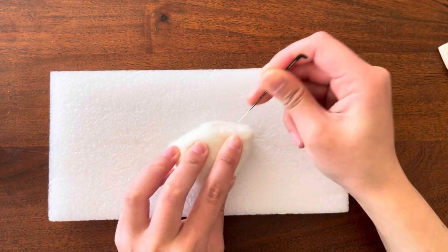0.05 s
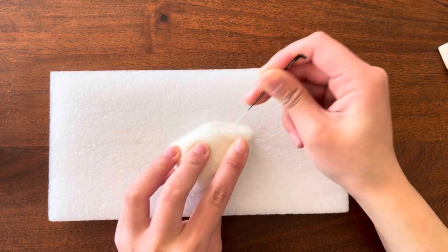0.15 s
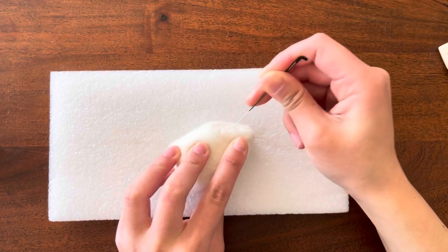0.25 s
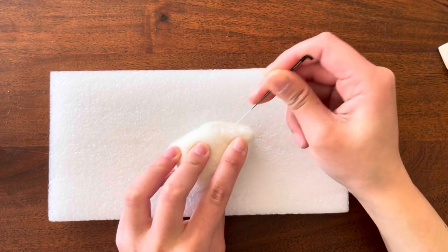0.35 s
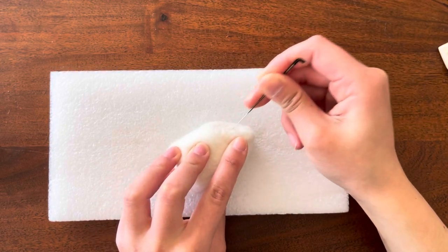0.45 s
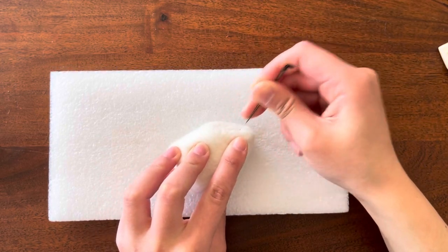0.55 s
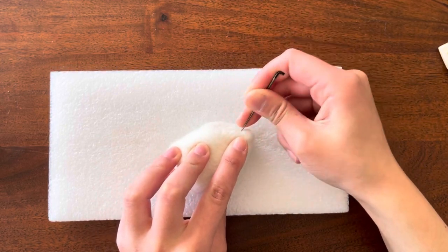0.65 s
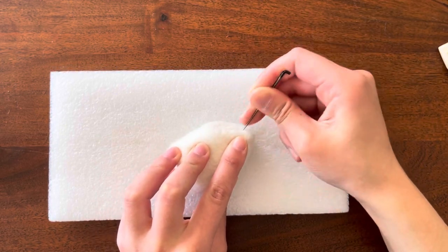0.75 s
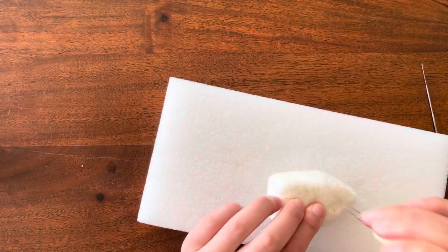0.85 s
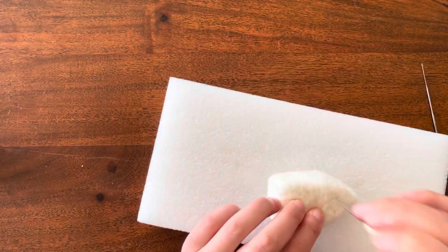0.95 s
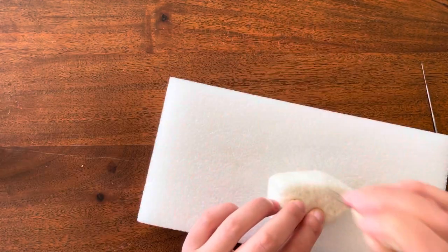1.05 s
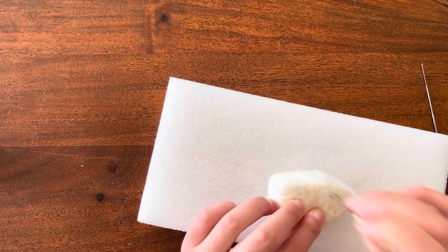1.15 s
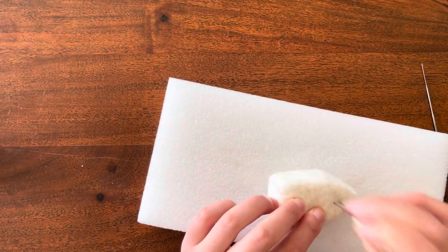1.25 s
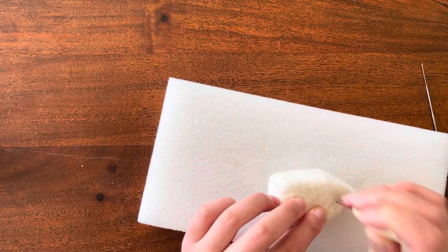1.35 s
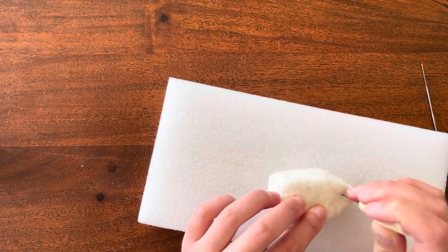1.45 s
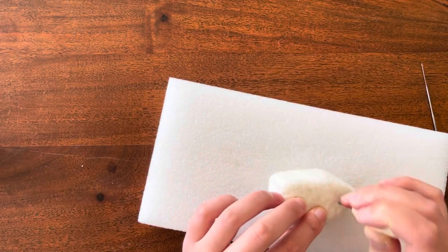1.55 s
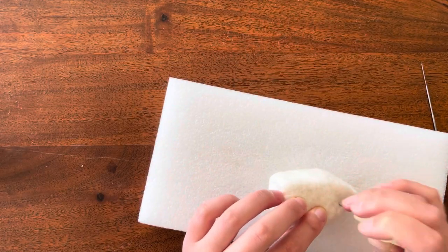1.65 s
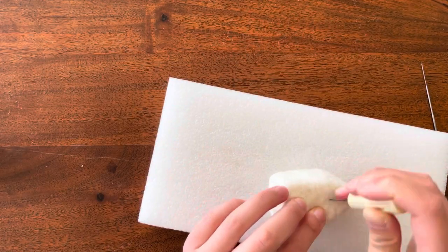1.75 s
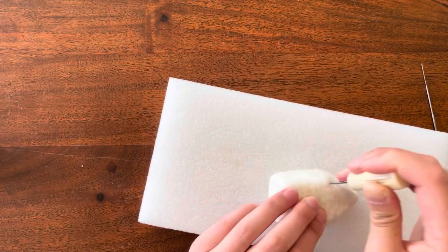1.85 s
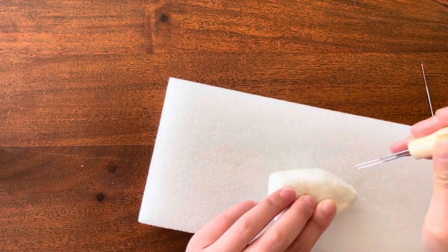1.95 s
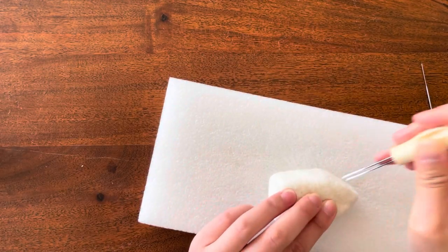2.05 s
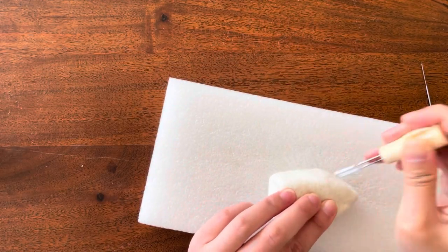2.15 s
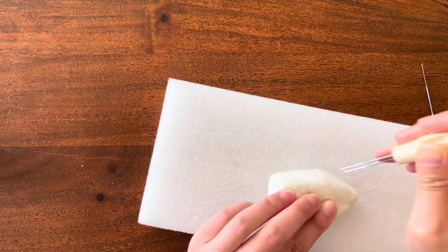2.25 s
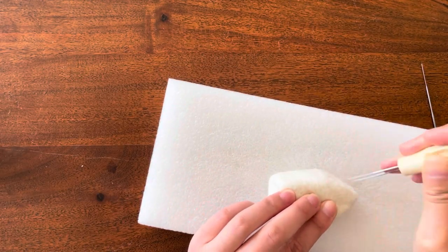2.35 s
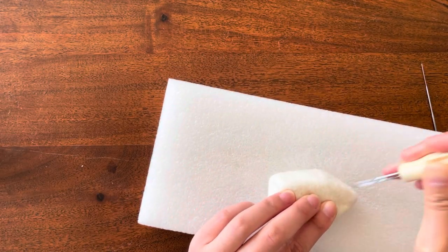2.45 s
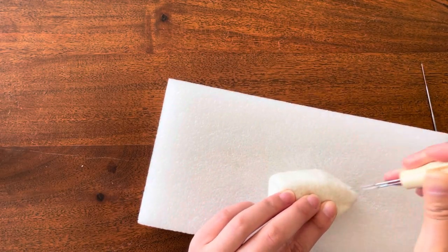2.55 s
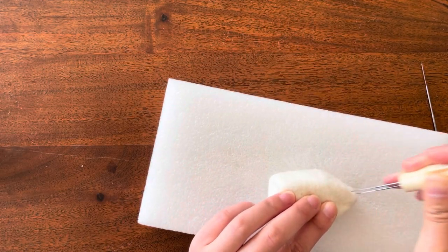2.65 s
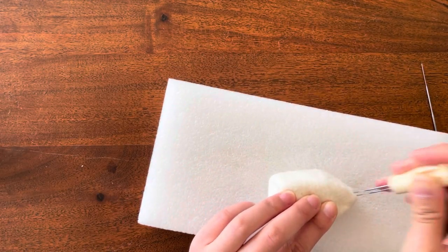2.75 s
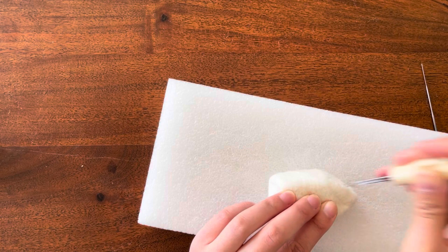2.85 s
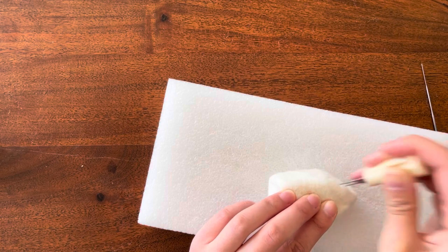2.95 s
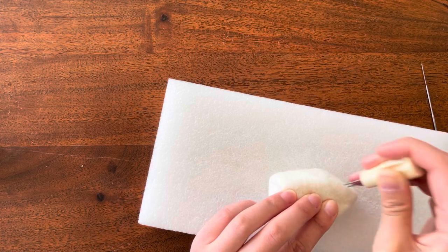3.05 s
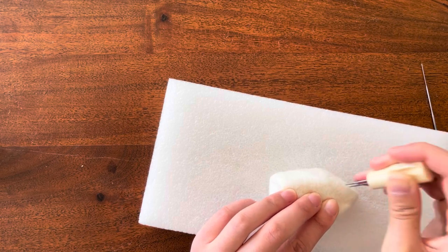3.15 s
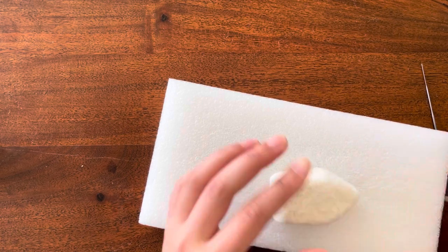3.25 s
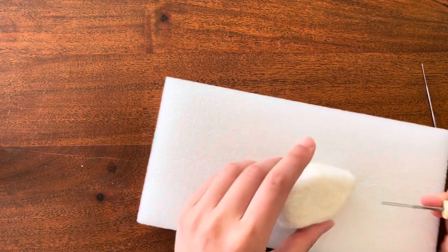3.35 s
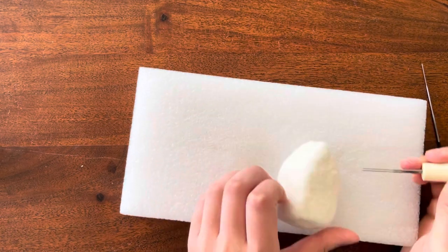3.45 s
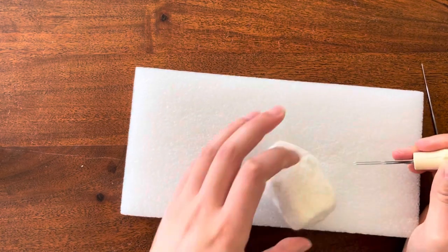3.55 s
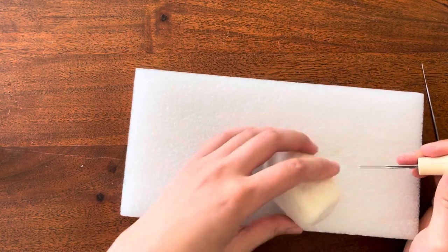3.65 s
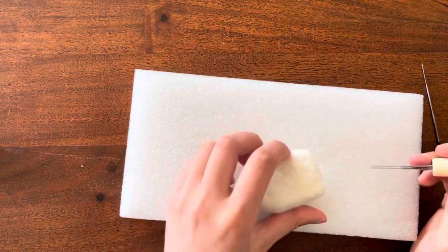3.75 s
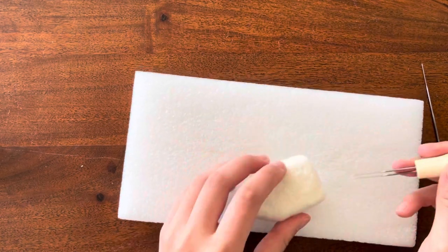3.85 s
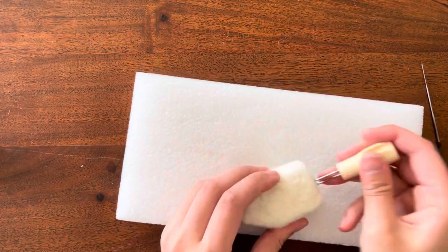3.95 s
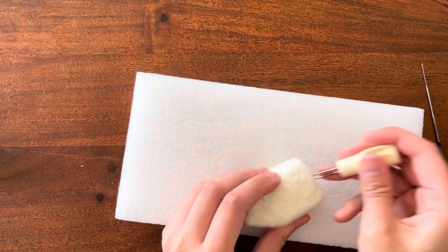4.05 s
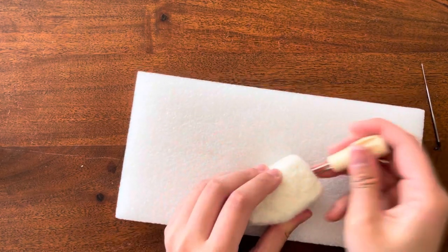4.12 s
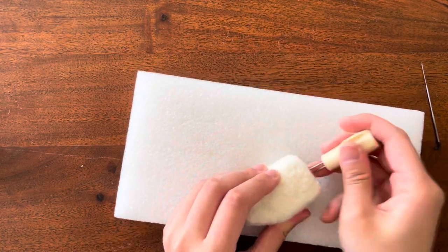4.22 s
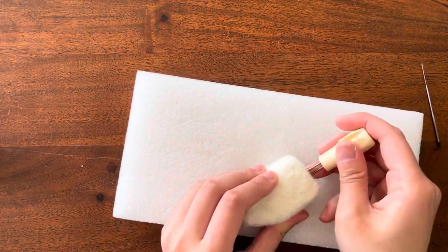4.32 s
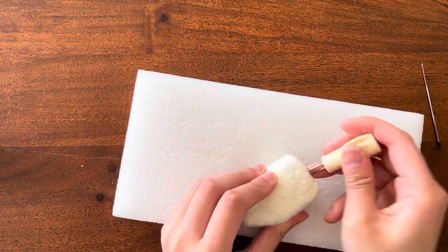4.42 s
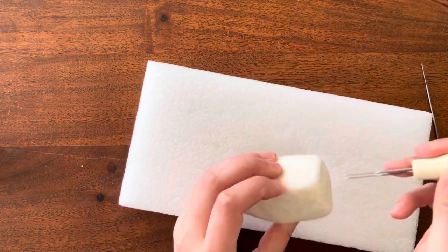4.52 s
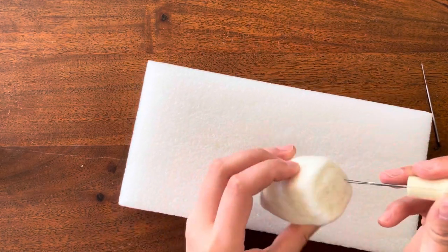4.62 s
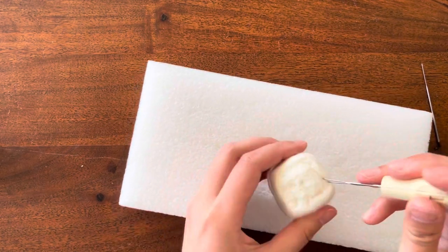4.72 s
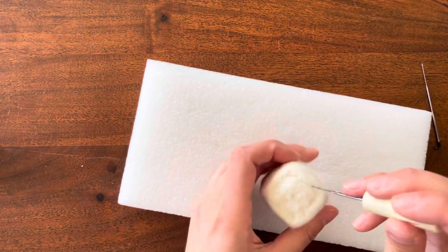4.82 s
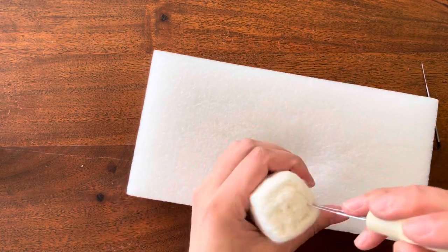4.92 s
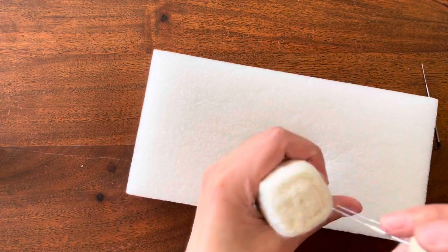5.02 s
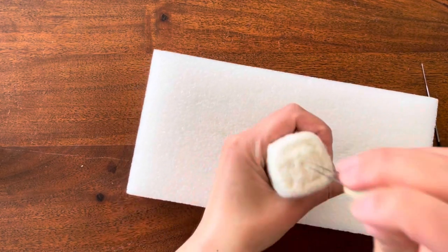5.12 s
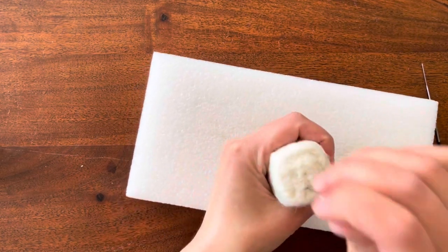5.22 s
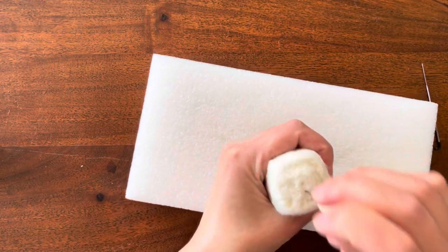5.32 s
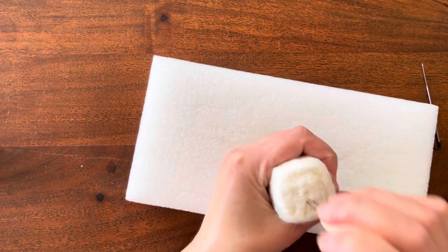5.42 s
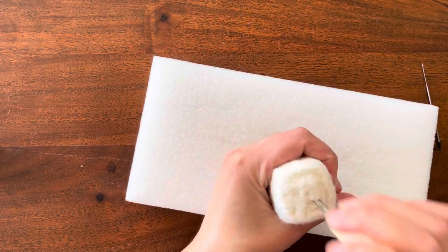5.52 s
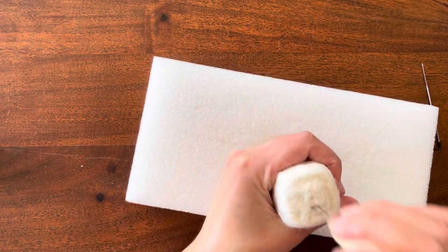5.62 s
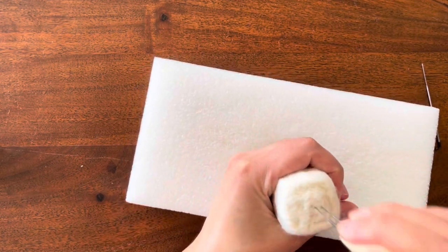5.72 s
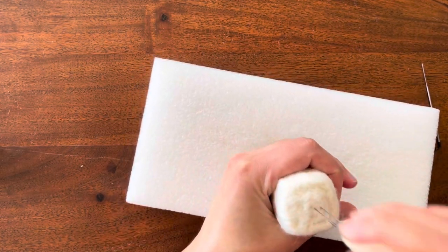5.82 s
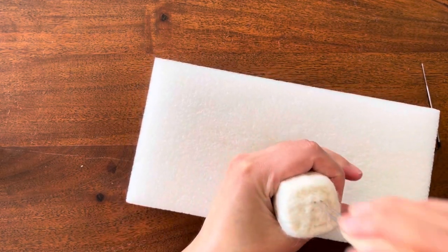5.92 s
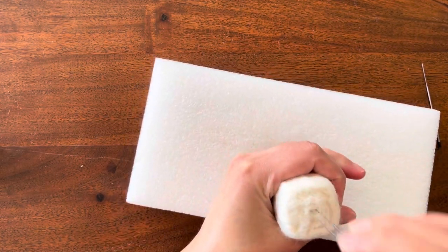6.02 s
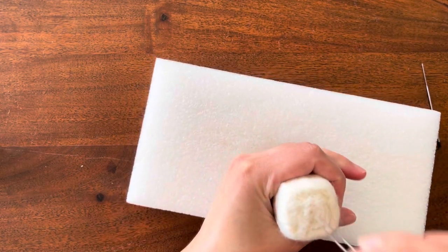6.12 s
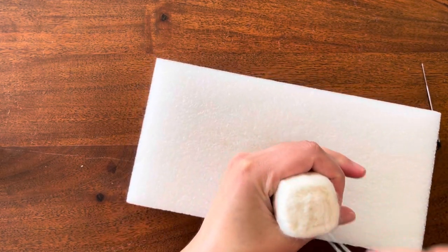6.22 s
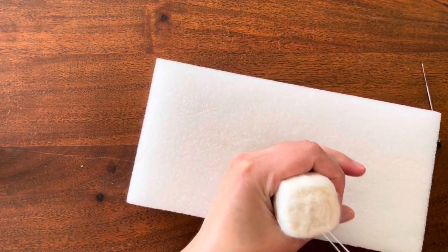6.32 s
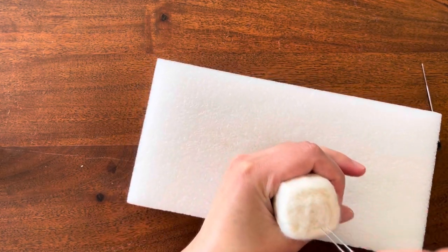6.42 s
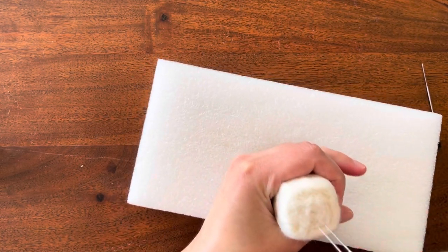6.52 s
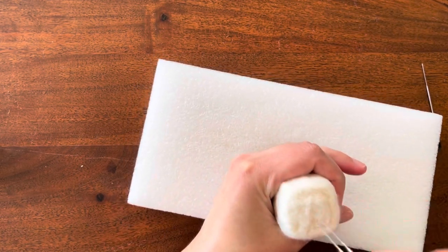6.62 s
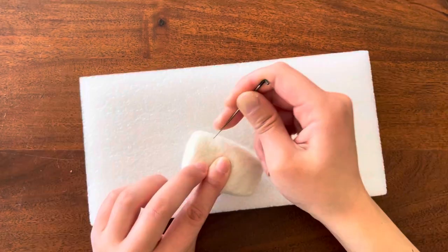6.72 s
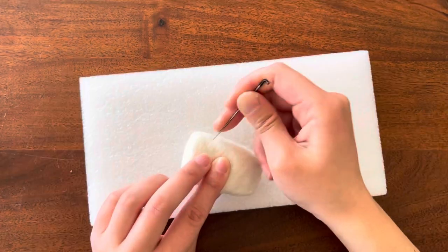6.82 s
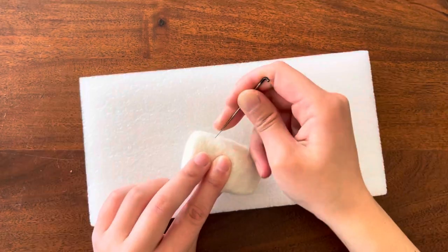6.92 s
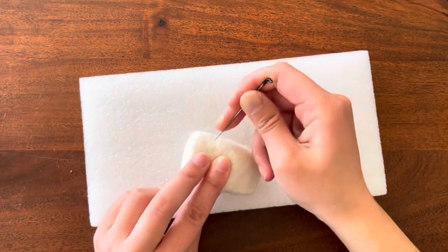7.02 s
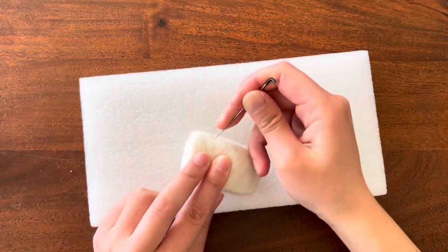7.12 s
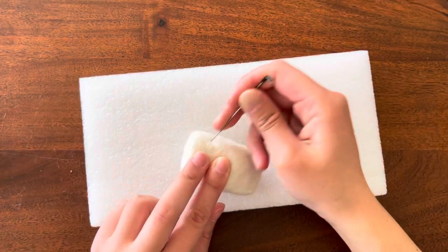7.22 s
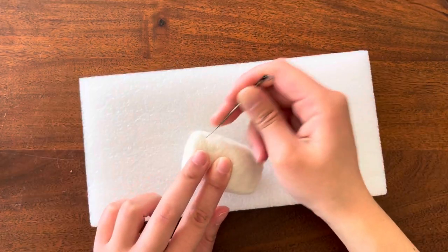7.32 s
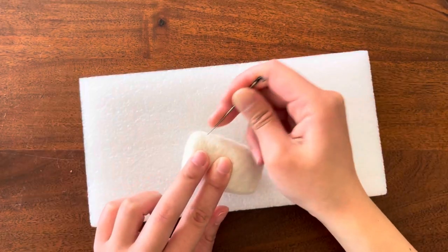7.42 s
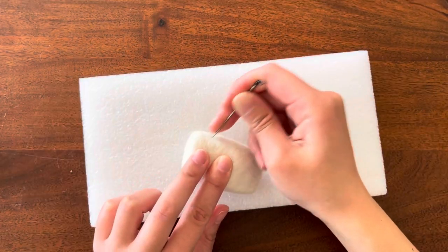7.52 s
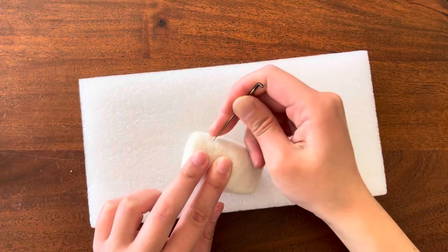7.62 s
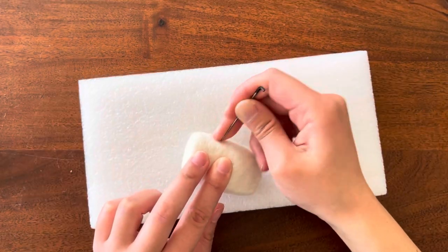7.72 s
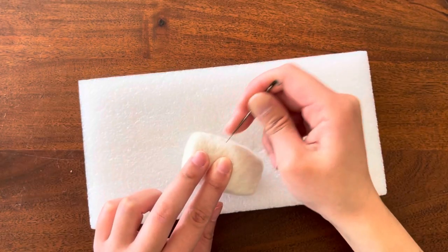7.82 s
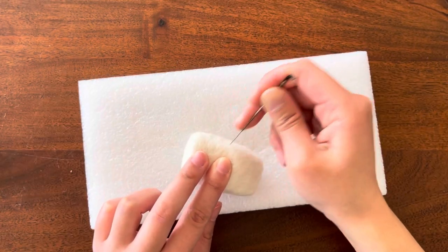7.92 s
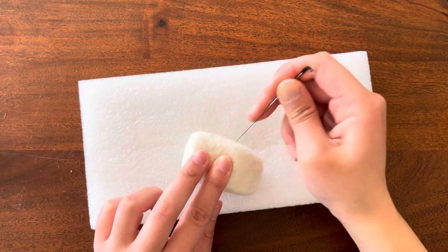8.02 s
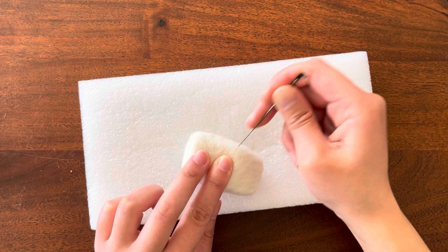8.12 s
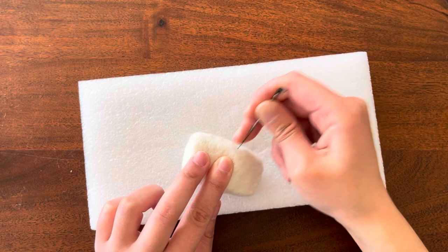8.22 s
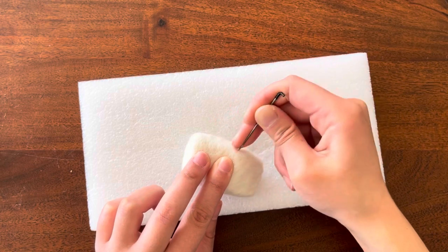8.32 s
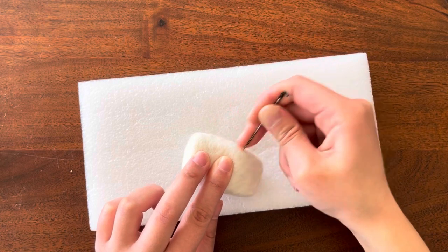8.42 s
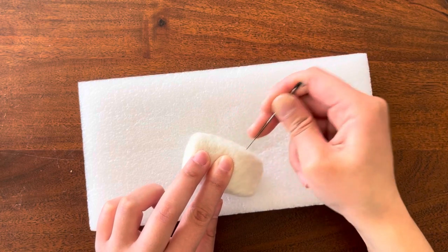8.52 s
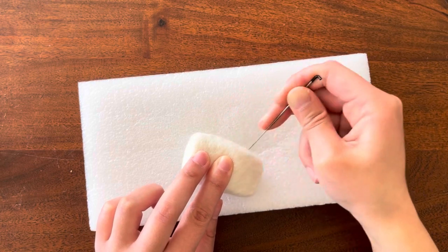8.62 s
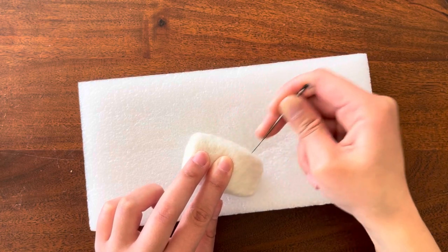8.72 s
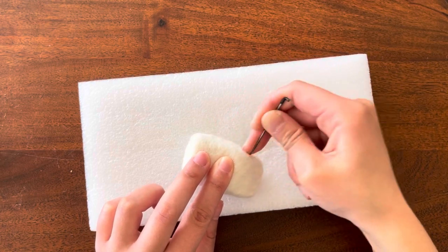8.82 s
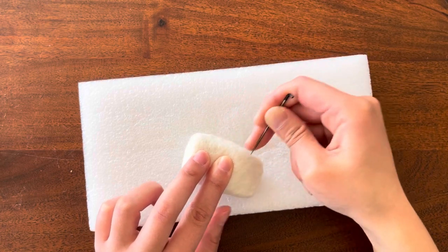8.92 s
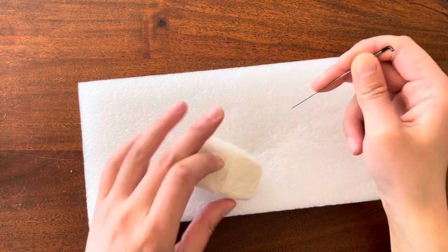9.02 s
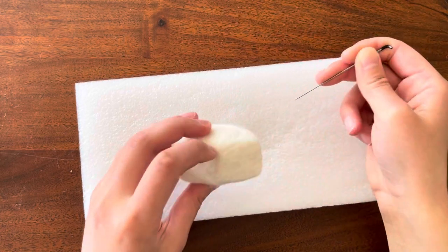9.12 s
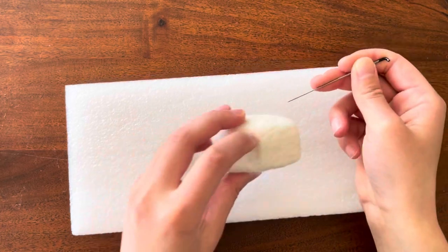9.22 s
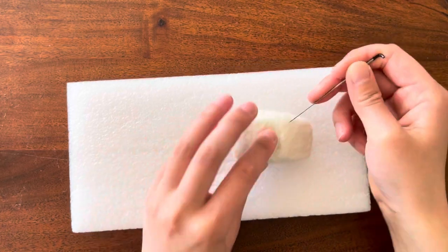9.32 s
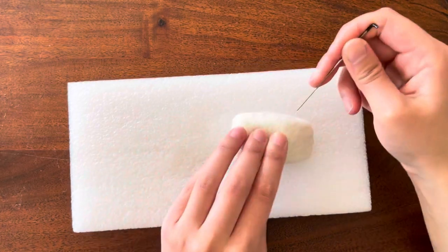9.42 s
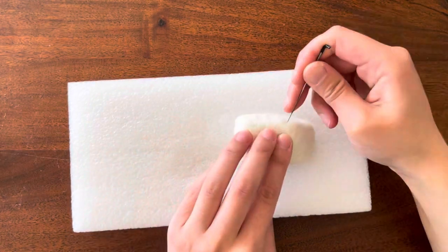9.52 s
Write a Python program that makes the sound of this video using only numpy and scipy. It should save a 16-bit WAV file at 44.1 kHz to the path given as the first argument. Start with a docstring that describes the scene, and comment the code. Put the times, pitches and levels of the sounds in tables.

```python
"""Needle felting at close range

Felting needles jab about ten times a second through wool on a foam pad, close to the microphone in a quiet room.
Each stab is a short crunch of shaped noise, barbs tearing past fibres, that drops to a thud in the modes of the
table; a fainter grainy hiss follows as the needle pulls out. One needle gives way to a three-needle tool whose
needles tick, then works alone again; between bouts the fingers rub and bump the wool over a low rumble.
"""
import sys
import numpy as np
from scipy import signal
from scipy.fft import rfft, irfft, next_fast_len
from scipy.io import wavfile
from scipy.ndimage import map_coordinates

SR = 44100
rng = np.random.default_rng(int(sys.argv[2]) if len(sys.argv) > 2 else 0)


def put_to_file(sound):
    """Save the sound as 16-bit audio at rate SR, in the file named by the first command-line argument."""
    columns = np.atleast_2d(sound).T  # one column per channel
    safe = np.clip(columns, -1, 1)
    whole_steps = np.round(safe * 32767)
    wavfile.write(sys.argv[1], SR, whole_steps.astype(np.int16))


N = 422037
EVENT_SIZE = 8192  # samples in one short event
TIME = np.arange(N) / SR
EVENT_TIME = (np.arange(EVENT_SIZE) - EVENT_SIZE // 2) / SR  # seconds around the event's centre

# Stabs: (time [s], length [s], force as a reference level [dB])
STABS = [(0.033, 0.011, -46), (0.135, 0.0087, -52), (0.228, 0.011, -50.5), (0.311, 0.01, -48.0),
         (0.402, 0.0091, -50), (0.495, 0.0091, -50.5), (0.584, 0.0093, -49.5), (0.669, 0.014, -48),
         (0.758, 0.013, -45.0), (0.905, 0.0088, -36.5), (1.002, 0.0079, -36), (1.098, 0.0061, -35),
         (1.195, 0.006, -33), (1.289, 0.0068, -36), (1.385, 0.0059, -35), (1.482, 0.0083, -40),
         (1.58, 0.0075, -41.0), (1.673, 0.0095, -42), (1.777, 0.0083, -40.5), (1.866, 0.0096, -41.5),
         (2.033, 0.014, -45), (2.127, 0.009, -41.5), (2.221, 0.014, -43.5), (2.315, 0.0099, -41),
         (2.412, 0.011, -40), (2.507, 0.016, -41.5), (2.598, 0.015, -44), (2.69, 0.014, -51.0),
         (2.783, 0.0096, -46.5), (2.889, 0.0096, -43.5), (2.979, 0.0066, -38), (3.072, 0.013, -40.5),
         (3.154, 0.012, -42.5), (3.948, 0.017, -48.5), (4.043, 0.01, -43.5), (4.14, 0.0096, -42),
         (4.237, 0.011, -44), (4.334, 0.0078, -42), (4.421, 0.0092, -44), (5.216, 0.016, -54),
         (5.316, 0.015, -47.0), (5.411, 0.015, -46.5), (5.508, 0.015, -47), (5.609, 0.014, -47.5),
         (5.709, 0.017, -50.5), (5.806, 0.018, -50.5), (5.905, 0.012, -45), (6.002, 0.016, -48.5),
         (6.101, 0.017, -49.5), (6.198, 0.01, -47), (6.296, 0.012, -50.0), (6.39, 0.011, -48),
         (6.487, 0.014, -47), (6.584, 0.015, -46.5), (6.68, 0.014, -50), (6.835, 0.01, -50.0),
         (6.943, 0.007, -49.0), (7.043, 0.0083, -53.0), (7.144, 0.012, -55.5), (7.251, 0.0056, -48.0),
         (7.357, 0.0087, -49.0), (7.452, 0.008, -53), (7.544, 0.0094, -45.5), (7.636, 0.01, -46.0),
         (7.725, 0.01, -44), (7.812, 0.014, -46.5), (7.898, 0.0093, -42), (7.991, 0.013, -46),
         (8.073, 0.0087, -44), (8.159, 0.011, -47.5), (8.245, 0.012, -43), (8.335, 0.01, -44.0),
         (8.422, 0.0092, -42), (8.507, 0.013, -46.0), (8.591, 0.013, -45.5), (8.673, 0.0061, -40.5),
         (8.755, 0.0061, -43.5), (8.837, 0.0084, -45), (8.921, 0.011, -47), (9.533, 0.011, -57.5)]
# Spectra of a stab: (frequency [Hz], relative level per hertz [dB])
# One needle through the wool's edge, its top, and deep into the pad
EDGE = [(150, -28), (330, -5), (600, -5.5), (820, 1.5), (1200, -5), (1650, -5.5), (1850, -17), (2300, -17),
        (2900, -8), (4000, -3.5), (5200, -17), (8500, -17.5), (11500, -11.5), (15500, -24)]
SHALLOW = [(150, -23), (330, -2), (450, -7.5), (610, -3.5), (730, -10.5), (1000, -13), (1650, -17.5),
           (2800, -21), (3900, -5.5), (5600, -20.5), (7000, -8.5), (8500, -14), (11000, -12), (15500, -19)]
DEEP = [(150, -30), (330, -1.5), (460, -2), (620, 1), (850, -0.5), (1400, -6.5), (1750, -16), (2850, -17),
        (3300, -5), (4000, -6.5), (5000, -9.5), (5600, -19.5), (11000, -15.5), (15500, -21)]
# Three needles into the wool lying flat, standing upright, and held in the hand; same columns
FLAT = [(150, -39), (330, -5.5), (460, -5.5), (570, 3), (850, 1.5), (1100, -1.5), (1350, 2), (1850, -14.5),
        (2600, -13), (4400, -10), (6200, -19), (8500, -19), (12000, -14), (15500, -18.5)]
UPRIGHT = [(150, -34), (330, -19), (540, -10), (750, -6.5), (860, -9.5), (1350, -5.5), (1750, -16),
           (2500, -11.5), (3250, -4.5), (4200, -14.5), (4850, -5), (5600, -16), (11000, -10), (15500, -15)]
HELD = [(150, -19), (330, -8.5), (570, -11.5), (900, -5.5), (1400, -0.5), (1850, -8.5), (2500, -3),
        (3250, -4), (4300, -6.5), (7000, -4), (8500, -6), (11000, -2), (15500, -10)]
# Ways of working: (start [s], stab spectrum, squareness of the burst [exponent],
#   scratch, crunch and thud over the force [dB, dB, dB], pull-out level at the usual force [dB],
#   pull-out delay [s], pull-out length [s], chance of a tick on landing and again on leaving [0-1])
GRIPS = [(0, EDGE, 2.1, 2.3, 0.1, -19.5, -70, 0.015, 0.021, 0),
         (.85, FLAT, 1.84, 1.8, -.5, -14, -65, 0.028, 0.022, .35),
         (1.95, FLAT, 2.05, 3, -0.2, -14.5, -61.5, 0.032, .028, .8),
         (3.5, UPRIGHT, 2, 6.8, -4, -11, -58.5, 0.02, 0.054, .3),
         (5.05, HELD, 6.2, 8.2, -4.5, -24.5, -58.5, .039, 0.011, .7),
         (6.75, SHALLOW, 2.5, 4.1, -1.6, -10.5, -74, 0.027, .013, 0),
         (7.5, DEEP, 2.1, 2.4, -0.35, -12.5, -73, 0.032, 0.017, 0)]
# Firmness of the last patch of wool, which moves the low crunch: (time [s], frequency ratio)
CRUNCH_PITCH = [(6.8, 1), (7.5, 0.84), (8.1, 0.89), (8.6, 1.23), (9.5, 1.23)]
# Modes of the table under the pad: (frequency [Hz], width [Hz], relative level [dB])
TABLE = [(143.5, 16, -6.5), (184, 31, -9.5), (244, 26.4, 4.5), (354.4, 12.4, -4.5)]
# Spectrum of the pull-out: (frequency [Hz], relative level per hertz [dB])
PULL_COLOUR = [(250, -9), (700, -18), (1400, -4), (2000, -3), (3200, -3.5), (4600, -2.5), (6500, -3.5),
               (12000, -5), (16000, -6)]
# Individually timed ticks of the steel needles: (time [s], level [dB])
TICKS = [(1.134, -45.5), (1.218, -44), (1.313, -46), (1.915, -43), (2.488, -38.5), (2.77, -37.5),
         (2.879, -33.5), (4.029, -43), (4.129, -42), (4.156, -41), (4.513, -41.5), (4.56, -44.5),
         (4.802, -47.5), (5.123, -46), (5.367, -40), (5.558, -41.5), (5.953, -40.5), (6.242, -40),
         (6.38, -37), (6.532, -32.5), (6.633, -39.5), (6.669, -38.5), (6.942, -43)]
# Spectrum of a tick: (frequency [Hz], relative level per hertz [dB])
TICK_COLOUR = [(400, -19), (1200, -22), (2000, -12), (2600, -13), (4400, 3), (8000, 3.5), (14000, 5.5),
               (16000, -15)]
# Fingers sliding and turning the wool: (time [s], half length [s], level [dB], fizz [0-1])
RUBS = [(3.335, 0.0033, -49, 0), (3.356, 0.0097, -44, 0.03), (3.38, 0.014, -50, 1),
        (3.453, 0.055, -50.5, 1), (3.63, 0.012, -55.5, 0), (3.677, 0.02, -49.5, 0),
        (3.717, 0.0056, -52, 0.1), (3.784, 0.02, -57, 0), (3.865, 0.021, -61.5, .1),
        (4.491, 0.021, -51.5, .2), (4.791, 0.015, -51.5, 0), (4.888, 0.048, -55, 0.8),
        (4.991, 0.0038, -60.5, 0.7), (5.098, 0.0048, -47.5, 0), (5.134, 0.0054, -50, 0.1),
        (5.164, 0.0099, -53, 0), (9.085, 0.018, -51, 0), (9.132, 0.008, -53.5, 0.8),
        (9.206, 0.029, -51, 0.8), (9.289, 0.016, -54.5, 0), (9.347, 0.07, -67.5, 0)]
# Spectrum of the rubbing: (frequency [Hz], relative level per hertz [dB])
RUB_COLOUR = [(180, -13), (400, -11), (900, -10.5), (1280, -7), (1900, -11), (2440, -1), (3100, -2.5),
              (4160, -7), (8640, -3.5), (12700, -6), (16000, -10)]
# Soft bumps of hands and wool on pad and table: (time [s], half length [s], pitch [Hz], level [dB])
BUMPS = [(1.214, 0.085, 166, -59), (3.456, 0.013, 204, -56), (3.673, 0.029, 139, -63),
         (4.037, 0.043, 142, -64), (4.912, 0.037, 98, -60.5), (5.137, 0.0087, 236, -51),
         (5.162, 0.011, 154, -56), (6.423, 0.15, 138, -59.5), (8.796, 0.5, 100, -70.5),
         (9.066, 0.0066, 203, -52)]
# Spectrum of a dull push on the foam: (frequency [Hz], relative level per hertz [dB])
KNOCK = [(60, -17), (130, -2), (300, -1.5), (550, -10), (900, -18), (2000, -44)]
# Likeness of left and right in the direct sound: (frequency [Hz], correlation [0-1])
ALIKE = [(100, 0.98), (700, 0.92), (1200, 0.77), (1900, 0.5), (2600, 1), (4500, 1), (5600, 0.68),
         (9500, 0.78), (11500, 1), (13000, 0.83), (15000, 1)]
# Decay of the room: (frequency [Hz], time to fall by 60 dB [s])
ROOM = [(150, 0.26), (600, 0.39), (3000, 0.21), (8000, 0.1), (16000, 0.14)]
# Likeness of left and right in the room's tail: (frequency [Hz], correlation [0-1])
ROOM_ALIKE = [(150, 1), (350, 0.78), (650, 0.36), (1200, 0.21), (2200, 0.75), (4000, 0.45)]
# Hands leaning on the table: (time [s], rumble level before RUMBLE_DB is added [dB])
HANDS = [(0, -72.5), (.6, -73.5), (1.2, -64.5), (1.6, -72), (2.1, -72.5), (2.45, -68.5), (2.75, -72),
         (3.05, -71), (4.3, -70), (4.7, -76), (5.2, -69.5), (6.4, -70.5), (7.1, -75), (7.7, -71.5),
         (8.6, -69.5), (9.57, -75.5)]
# Spectrum of the rumble: (frequency [Hz], relative level per hertz [dB])
RUMBLE = [(30, -60), (60, -11), (78, -11.5), (95, 0.5), (115, -3), (138, 3), (170, -1.5), (260, -17),
          (500, -32.5)]
# Spectrum of the room tone: (frequency [Hz], relative level per hertz [dB])
QUIET = [(25, -31), (150, -10), (260, -6.5), (500, -14), (1160, -28), (2500, -26.5), (4400, -29),
         (6400, -29), (14000, -37), (16000, -45)]
# Phase between the two microphone ports: (frequency [Hz], lead of the left [rad])
PORTS = [(4500, 0), (5400, 0.93), (6200, 0.76), (7400, 0.67), (8700, 1.54), (9700, 2), (10500, 5.5),
         (11300, 5), (13000, 6.5), (14000, 7), (16000, 8.6)]
# Response of the microphone: (frequency [Hz], gain [dB])
MICROPHONE = [(8500, -.5), (9750, -5), (11000, -2), (13000, -1.2), (15500, 2.5)]

USUAL_FORCE_DB, USUAL_LENGTH_S = -45, 0.01
THUD_DB_PER_DOUBLING, THUD_SCATTER_DB = 4, 2  # a longer stab goes deeper and pushes the pad harder
PULL_DB_PER_FORCE_DB, PULL_SCATTER_DB = 0.29, 1.1  # the pull-out follows the force only loosely
PITCH_SCATTER, COLOUR_SCATTER_DB = 0.026, 1.67  # every stab meets different fibres; pitch as log ratio
CRUNCH_TOP_HZ = 2000  # firmness moves only the spectrum points below this
LANDING_DB, LANDING_SCATTER_DB = -2, 0.5  # tick of the landing tips, over the force
LANDING_LEAD = 0.97  # stab lengths ahead of the stab's middle
LEAVING_DB, LEAVING_SCATTER_DB = -48.5, 1  # needles touching on the way out
LEAVING_AFTER_S, LEAVING_WITHIN_S = 0.018, 0.03  # earliest moment after the stab, and the window that follows
ROOM_DB = -13.0
RUMBLE_DB, QUIET_DB = 1, -74.5  # offset on the HANDS curve; level of the room tone
TOP_HZ = 16100  # band limit of the microphone


def needling():
    """Excitation strength: force and grip set the level of each stab's crunch, thud and pull-out."""
    wool, thuds = np.zeros((2, N)), np.zeros((2, N))
    luck = rng.standard_normal((len(STABS), 2))
    for (s, length, force_db), (thud_luck, pull_luck) in zip(STABS, luck):
        colour, squareness, scratch_db, crunch_db, thud_db, pull_db, pull_delay, pull_length, _ = grip_at(s)
        depth_db = THUD_DB_PER_DOUBLING * np.log2(length / USUAL_LENGTH_S)
        thud_db += force_db + depth_db + THUD_SCATTER_DB * thud_luck
        pull_db += PULL_DB_PER_FORCE_DB * (force_db - USUAL_FORCE_DB) + PULL_SCATTER_DB * pull_luck
        spectrum = met_fibres(colour, s)
        add(wool, s, stab(length, force_db + scratch_db, force_db + crunch_db, spectrum, squareness))
        add(wool, s, pull_out(pull_db, pull_delay, pull_length))
        add(thuds, s, thud(length, thud_db))
    return stereo(wool) + thuds


def grip_at(s):
    """The way of working, constant within a bout, that holds at time s."""
    return [grip[1:] for grip in GRIPS if grip[0] <= s][-1]


def met_fibres(colour, s):
    """Source variation: the fibres met shift and tint the spectrum; firmness moves only the low crunch."""
    hz, db = np.transpose(colour)
    firmness = np.where(hz < CRUNCH_TOP_HZ, np.interp(s, *np.transpose(CRUNCH_PITCH)), 1)
    shifted = hz * firmness * np.exp(PITCH_SCATTER * rng.standard_normal())
    return np.transpose([shifted, db + COLOUR_SCATTER_DB * rng.standard_normal(len(db))])


def stab(length, scratch_db, crunch_db, colour, squareness,
         split_hz=1800, sink_s=0.00654, sink_hz=450, low_hz=290):
    """Friction noise with dispersion: barbs scratch, and the crunch sinks in pitch as the needle goes deeper."""
    graze = 0.11 * swell(-0.7 * length, 0.0043, 2.4, lean=0)  # the tip brushes loose fibres first
    contact = np.clip((EVENT_TIME + 0.006 + 0.65 * length) / 0.006, 0, 1)  # 6 ms onset
    tearing = contact * swell(0, 0.65 * length, squareness, lean=0.11)
    catching = fibres(rate=900, spread_db=3.5, size=EVENT_SIZE) * (graze + tearing)
    tear = coloured(catching, colour)

    def above(hz, edge):
        return 1 / (1 + (edge / (hz + 1)) ** 8)

    def crunch_response(hz):
        delay = sink_s / (1 + (hz / sink_hz) ** 2)  # group delay: the low part comes last
        lag = np.exp(-2j * np.pi * np.cumsum(delay) * hz[1])
        return (above(hz, low_hz) - above(hz, split_hz)) * lag

    scratch = filtered(tear, lambda hz: above(hz, split_hz))
    crunch = filtered(tear, crunch_response)
    crunch = np.array([sized(channel, crunch_db, length) for channel in crunch])
    return sized(scratch, scratch_db, length) + crunch


def thud(length, db):
    """Forced modes: the stab bottoms out and pushes the table through the foam."""
    push = swell(0.5 * length, 0.0013, 4.9, lean=0) * (1 + 2.7 * rng.standard_normal(EVENT_SIZE))
    slow_push = swell(length, 0.019, 2.6, lean=-0.15) * rng.standard_normal(EVENT_SIZE)
    return sized(filtered(push + 1.05 * slow_push, table), db, 0.034) * np.ones((2, 1))


def table(hz):
    """Modal sum of the table, alternating in sign; the deep bass does not radiate."""
    modes = sum((-1) ** k * amp(db) * resonance(hz, centre, width)
                for k, (centre, width, db) in enumerate(TABLE))
    return modes * 1j * hz / (1j * hz + 110)


def resonance(hz, centre, width):
    """Causal response of one damped mode."""
    return 1j * hz * width / (centre * centre - hz * hz + 1j * hz * width)


def pull_out(db, delay, length):
    """Sliding friction: trailing barbs hiss softly while a few fibres snap as sparse impulses."""
    snaps = (rng.random(EVENT_SIZE) < 160 / SR) * rng.standard_normal((2, EVENT_SIZE))  # 160 a second
    hiss = fibres(rate=490, spread_db=4.0, size=EVENT_SIZE)
    slide = (hiss + 9 * snaps) * swell(delay, length, 3.4, lean=-0.1) * (EVENT_TIME > 0)
    return sized(coloured(slide, PULL_COLOUR), db, 0.063)


def ticks(life=0.0018):
    """Damped impact: needles snap against each other and the wool damps them at once (life in s)."""
    track = np.zeros((2, N))
    for s, db in TICKS + chance_ticks():
        decay = np.exp(-np.abs(EVENT_TIME) / life) * (EVENT_TIME >= 0)
        snap = rng.standard_normal((2, EVENT_SIZE)) * decay
        add(track, s - 0.0004, sized(coloured(snap, TICK_COLOUR), db, 0.0017))
    return stereo(track)


def chance_ticks():
    """Random contacts of the tool's needles as they land and leave: (time [s], level [dB])."""
    touches = []
    for s, length, force_db in STABS:
        (lands, leaves, when), (land_luck, leave_luck) = rng.random(3), rng.standard_normal(2)
        chance = grip_at(s)[-1]
        if lands < chance:
            landing_db = force_db + LANDING_DB + LANDING_SCATTER_DB * land_luck
            touches.append((s - LANDING_LEAD * length, landing_db))
        if leaves < chance:
            leaving_s = s + LEAVING_AFTER_S + LEAVING_WITHIN_S * when
            touches.append((leaving_s, LEAVING_DB + LEAVING_SCATTER_DB * leave_luck))
    return touches


def rubbing(bright_hz=11000):
    """Friction noise of wool dragged over foam and skin: a grainy hiss, with extra fizz in the brisk moves."""
    moves = np.array([amp(db) * stroke(s, half_length) for s, half_length, db, _ in RUBS])
    level = np.linalg.norm(moves, axis=0)  # overlapping moves add in power
    briskness = np.linalg.norm(moves * np.array(RUBS)[:, -1:], axis=0)
    grain = unit(stereo(coloured(fibres(rate=600, spread_db=2.5, size=N), RUB_COLOUR)))
    fizz = filtered(grain, lambda hz: 1 / (1 + (bright_hz / (hz + 1)) ** 12))  # steep high-pass
    return level * grain + briskness * fizz


def bumps(width_hz=16, knock_s=0.011):
    """Modal excitation: a landing or shifting hand makes one low mode hum; quicker landings knock more."""
    track = np.zeros(N)
    for s, half_length, pitch_hz, db in BUMPS:
        press = stroke(s, half_length)
        push = press * rng.standard_normal(N)
        hum = filtered(push, lambda hz: resonance(hz, pitch_hz, width_hz) * resonance(hz, pitch_hz, pitch_hz))
        knock = np.clip(knock_s / half_length, 0, 1) * unit(coloured(push, KNOCK))
        track += amp(db) * unit(unit(hum) + knock) * np.sqrt(np.mean(press ** 2))
    return track


def stroke(s, half_length):
    """Envelope of a hand's move that swells and fades around time s."""
    return np.exp(-0.5 * np.minimum(np.abs((TIME - s) / half_length), 6) ** 2.66)


def room(x, size=8192):
    """Convolution with a diffuse tail, drawn anew for each block so that no one noise pattern colours the whole."""
    wet = np.zeros((2, N + SR))
    for start in range(0, N, size):
        block = x[:, start:start + size].mean(axis=0)[None]
        answer = signal.fftconvolve(block, room_tail(), axes=1)
        wet[:, start:start + answer.shape[1]] += answer
    return wet[:, :N]


def room_tail():
    """Diffuse decay of a small room: noise whose bands die at their own rates, the treble sooner."""
    hz, t, z = signal.stft(rng.standard_normal((2, SR // 3)), SR, nperseg=256)
    decay = amp(-60 * t / along(ROOM, hz)[:, None])
    tail = stereo(signal.istft(z * decay, SR, nperseg=256)[1], ROOM_ALIKE)
    return np.pad(tail / np.linalg.norm(tail[0]), ((0, 0), (SR // 200, 0)))  # 5 ms before the tail


def background():
    """Stationary noise and a modulated one: the table rumbles under the hands, over faint room tone."""
    def noise(colour):
        return unit(stereo(coloured(rng.standard_normal((2, N)), colour)))

    rumble = amp(RUMBLE_DB + np.interp(TIME, *np.transpose(HANDS))) * noise(RUMBLE)
    return rumble + amp(QUIET_DB) * noise(QUIET)


def fibres(rate, spread_db, size):
    """Stick-slip as two noises in shared clumps: fibres catch and let go at random strengths."""
    return unit(amp(spread_db * wobble(rate, size)) * rng.standard_normal((2, size)))


def wobble(rate, size):
    """Band-limited fluctuation: a smooth random curve, rate knots a second."""
    return map_coordinates(rng.standard_normal(size // 8), [np.arange(size) * rate / SR], mode="wrap")


def swell(centre, length, squareness, lean):
    """Asymmetric burst envelope: it builds more slowly than it stops when lean is positive."""
    u = EVENT_TIME - centre
    side_length = length * (1 - np.clip(lean, -0.8, 0.8) * np.sign(u))
    return np.exp(-0.5 * np.abs(u / side_length) ** squareness)


def amp(db):
    """Decibels to amplitude gain."""
    return 10 ** (np.asarray(db) / 20)


def unit(x):
    """Normalisation to an rms of 1."""
    return x / np.sqrt(np.mean(x ** 2) + 1e-30)


def sized(x, db, length):
    """Energy normalisation: x gets the energy of a level db held for length seconds."""
    return unit(x) * amp(db) * np.sqrt(length * SR / EVENT_SIZE)


def add(track, s, event):
    """Superposition of an event centred on time s."""
    at = round(s * SR) - EVENT_SIZE // 2 + np.arange(EVENT_SIZE)
    inside = (at >= 0) & (at < N)
    track[:, at[inside]] += event[:, inside]


def along(points, hz):
    """(Hz, value) points interpolated on a logarithmic frequency axis."""
    f, v = np.transpose(points)
    return np.interp(np.log(hz + 1), np.log(f + 1), v)


def filtered(x, response):
    """Linear filtering: the spectrum of x times a response of frequency."""
    n = x.shape[-1]
    m = next_fast_len(n + EVENT_SIZE)
    return irfft(rfft(x, m) * response(np.fft.rfftfreq(m, 1 / SR)), m)[..., :n]


def coloured(x, points):
    """Spectral shaping of x by (Hz, dB) points."""
    return filtered(x, lambda hz: amp(along(points, hz)))


def stereo(pair, alike=ALIKE):
    """Interchannel correlation: mid and side from two unrelated signals give left and right the set likeness."""
    def mid_side(hz):
        turn = np.arccos(np.clip(along(alike, hz), -1, 1)) / 2
        return np.array([np.cos(turn), np.sin(turn)])

    mid, side = filtered(pair, mid_side)
    return np.array([mid + side, mid - side])


def scene():
    """Superposition of the handwork, its faint room answer, the bumps and the background."""
    work = needling() + ticks() + rubbing()
    return work + amp(ROOM_DB) * room(work) + bumps() + background()


def record(dry):
    """Transducer response: two ports out of phase in the treble, a dip near 10 kHz and a steep band limit."""
    def response(hz):
        ports = np.exp(0.5j * np.outer([1, -1], along(PORTS, hz)))
        return ports * amp(along(MICROPHONE, hz)) * (hz < TOP_HZ)

    return filtered(dry, response)


dry = scene()
out = record(dry)
put_to_file(out)
```